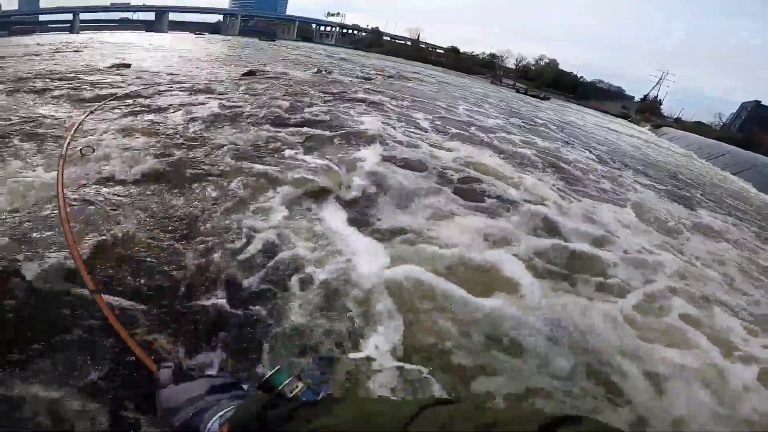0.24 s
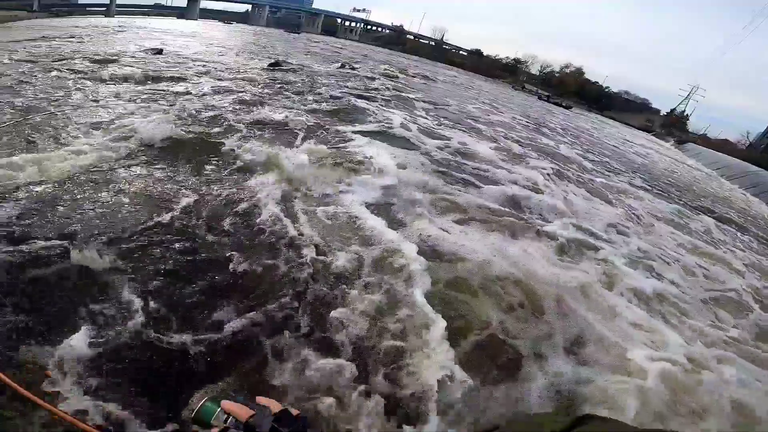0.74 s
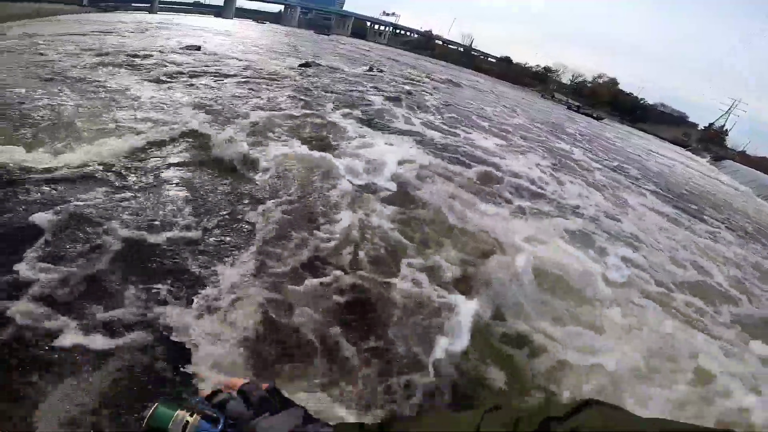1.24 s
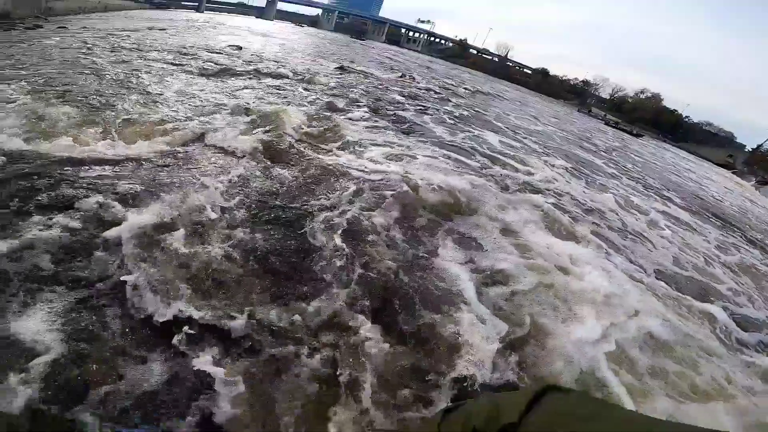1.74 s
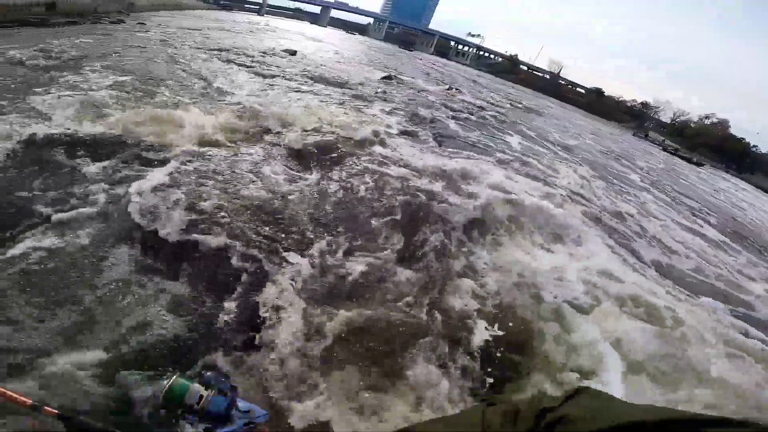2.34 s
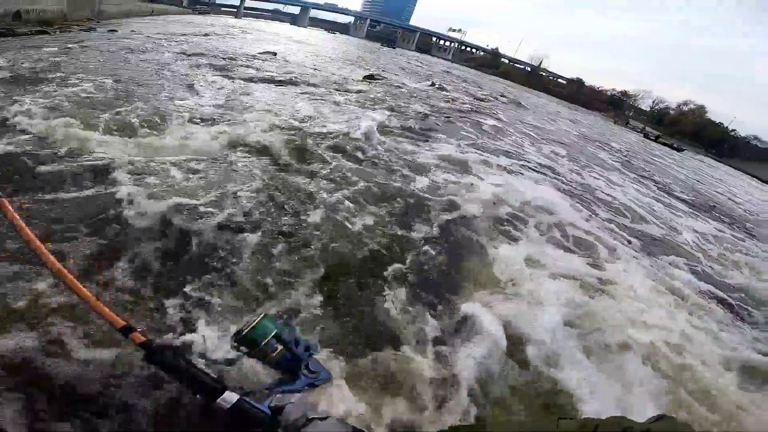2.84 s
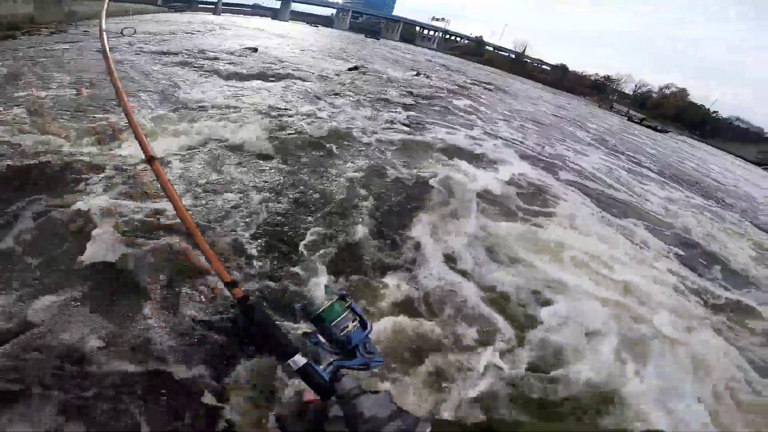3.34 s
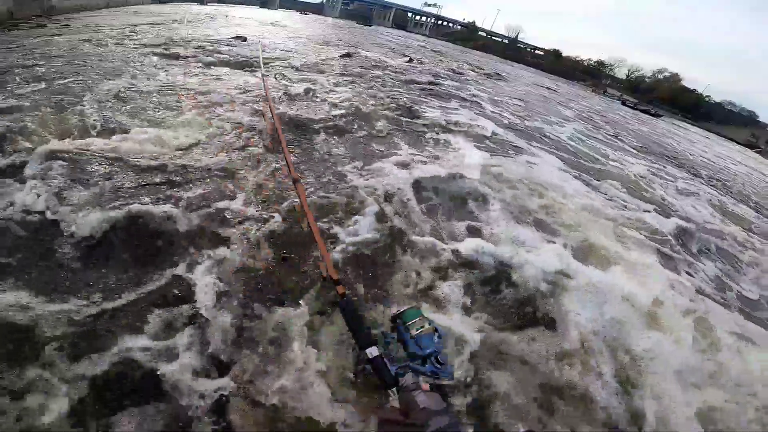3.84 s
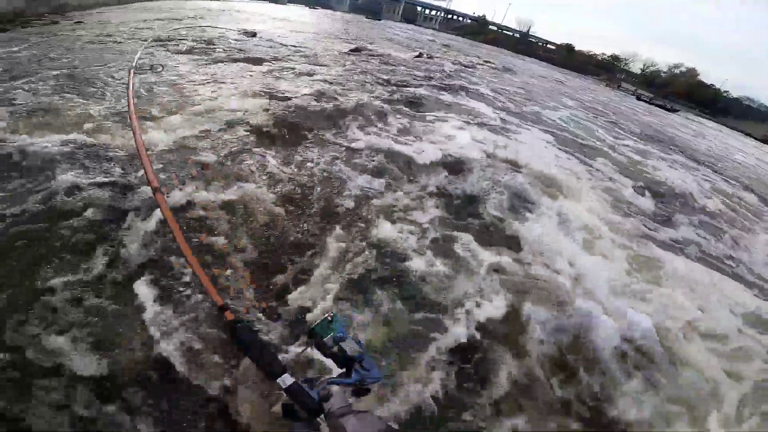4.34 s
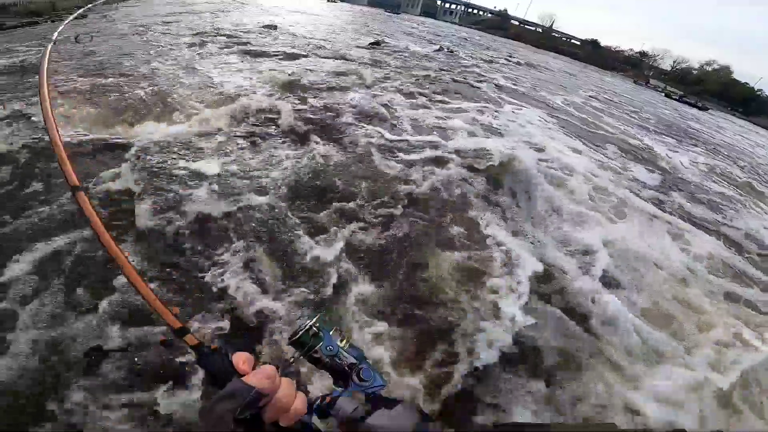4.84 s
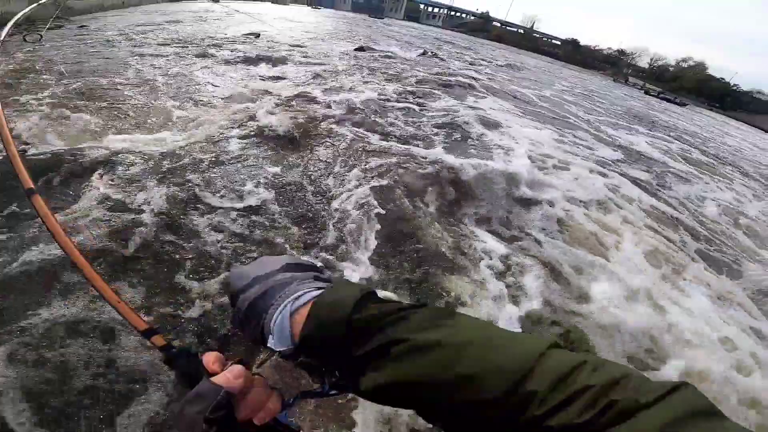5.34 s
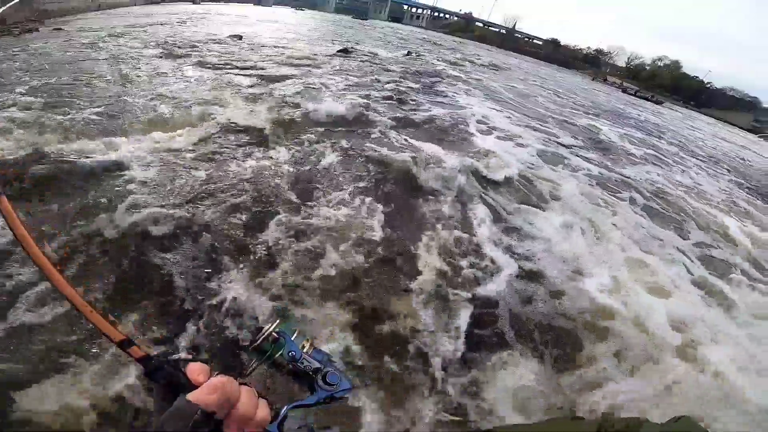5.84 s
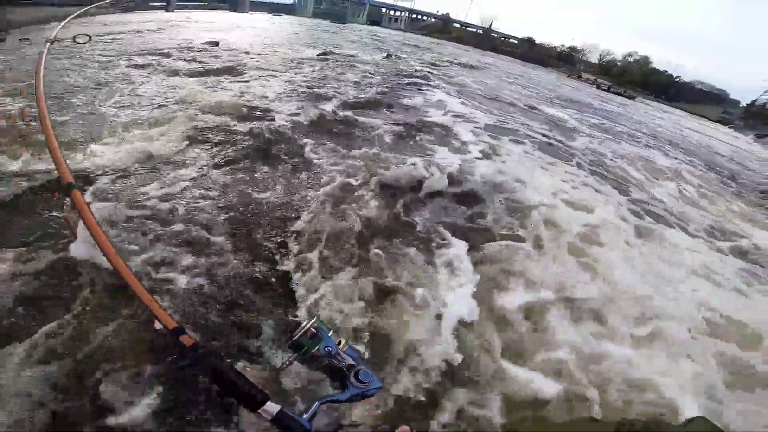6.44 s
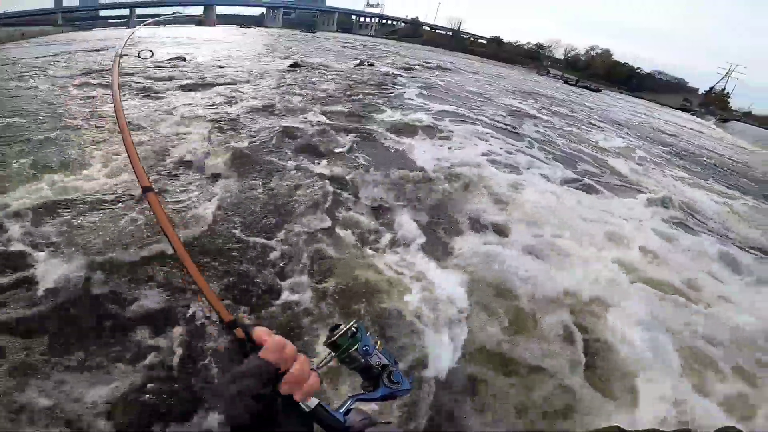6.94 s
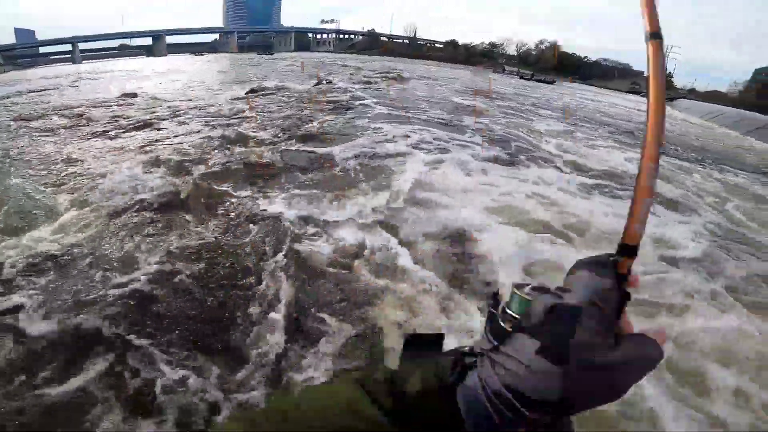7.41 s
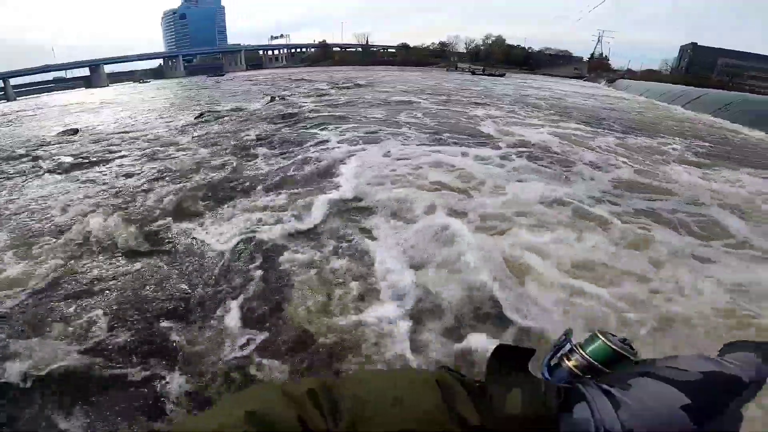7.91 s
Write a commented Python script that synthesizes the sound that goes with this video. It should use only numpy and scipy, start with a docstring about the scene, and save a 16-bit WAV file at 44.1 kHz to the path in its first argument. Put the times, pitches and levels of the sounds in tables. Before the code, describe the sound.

Whitewater below a low dam roars throughout, hollow and dull through a closed camera case at the water's edge. Nearby waves swell gently and a few drops slap and plink close in. Low wind buffets the microphone, strongest about halfway, where the river briefly dips in level and fishing gear knocks once. The wind then eases to a breeze, with a few more gusts and drops near the end.

```python
"""Whitewater below a low dam, from the two microphones of a cased camera on an angler at the water's edge.
Foam and bubbles roar throughout, hollow and dull through the closed case, and wind thumps on its wall.
Waves break nearby; from 1.2 s a few drops slap and plink close in. Around 4 s the strongest gusts make
the gain control duck the river, and the fishing gear knocks once. The wind falls to a breeze, and after
7 s the angler turns toward the dam, which changes the colour of the water."""
import sys
import numpy as np
from scipy import signal
from scipy.fft import rfft, irfft, next_fast_len
from scipy.io import wavfile
from scipy.ndimage import uniform_filter1d, minimum_filter1d, map_coordinates

SR = 44100
rng = np.random.default_rng(int(sys.argv[2]) if len(sys.argv) > 2 else 0)


def store_pcm(level_fs):
    """Save levels as 16-bit WAV."""
    pcm = np.round(np.clip(level_fs, -1, 1) * 32767).astype(np.int16)
    wavfile.write(sys.argv[1], SR, np.atleast_2d(pcm).T)


N = 360297

# rushing water as it reaches the microphones through the case wall: f/Hz, gain/dB
WATER_SPECTRUM = [(30, -18), (70, -1.5), (190, -0.5), (400, -6), (800, -13.5), (1600, -8), (2100, -19),
                  (4000, -21.5), (5100, -23), (6500, -30.5), (8600, -49.5), (12500, -50.5), (13700, -66)]
# peaks and notches of the case at each microphone: f/Hz, half width/Hz, left/dB, right/dB
CASE_RESONANCES = [(573, 200, 0, -2), (820, 89, -0.5, -4.5), (956, 175, 5, 1), (1212, 162, 6, -1),
                   (1320, 130, 2.4, 6.2), (2200, 98, 0.5, 2), (2528, 230, 7.5, 2), (2810, 100, 3, 0),
                   (3054, 158, 9, 6.5), (3360, 186, 8.5, 4), (3912, 325, 9.5, 6), (4540, 190, 2, 5.5),
                   (4890, 170, -2, 4), (5080, 130, 2.5, 2), (5350, 680, 3.5, 4), (5780, 1020, -6.5, 0.5),
                   (6380, 130, 2, -0.5), (7830, 810, 9, -4), (11700, 2000, 4, -8.5)]
# likeness of the water at the two microphones: f/Hz, coherence/0-1
MIC_COHERENCE = [(120, 0.97), (300, 0.98), (710, 0.94), (830, 0.68), (930, 0.82), (1290, 0.87),
                 (1420, 0.63), (1700, 0.97), (1950, 0.7), (2230, 0.9), (2620, 0.76), (2830, 0.7),
                 (3020, 0.65), (3400, 1), (3600, 0.5), (3880, 0.78), (4520, 0), (5080, 0.63), (5420, 0.3),
                 (5900, 0.6), (6170, 0.08), (6750, 0.5), (8000, 0.05)]
# how far the left microphone trails the right: f/Hz, phase/rad
MIC_LAG = [(100, 0), (600, 0.23), (1120, 0.03), (1600, 0.5), (1900, 1.05), (2220, 2.5), (2400, 2.05),
           (2730, 1.9), (2920, 1), (3150, 0.82), (3700, 1.85), (3920, 1.63), (4350, 2.5), (4750, 2.5),
           (5950, 4), (6400, 6), (7300, 5.2)]
# wind on the case, freshening and then dropping to a breeze: t/s, level/dB
WIND_LEVEL = [(0.0, -30), (1.6, -36.5), (2.3, -30), (2.7, -24.5), (3.7, -27.5), (4.2, -31.5), (6.0, -34),
              (7.0, -34), (8.15, -35)]
# gusts and lulls, over that wind: middle t/s, length/s, level/dB
WIND_GUSTS = [(0.155, 0.05, 4), (0.31, 0.17, -6.5), (0.55, 0.12, 6.5), (0.82, 0.12, 5.5),
              (1.16, 0.062, 7.5), (1.53, 0.14, -2), (1.83, 0.18, 4), (2.09, 0.2, 6.5), (2.31, 0.055, -2),
              (2.41, 0.07, 5), (2.65, 0.051, 5), (2.81, 0.044, -3), (2.9, 0.05, 4), (3.11, 0.04, 4),
              (3.56, 0.16, 7.5), (3.68, 0.046, -6), (3.8, 0.16, 10), (3.94, 0.037, -3), (4.04, 0.072, 14.5),
              (4.3, 0.12, -2.5), (4.5, 0.044, 7.5), (4.88, 0.1, -8), (5.05, 0.045, 4.5), (6.0, 0.055, -7),
              (6.11, 0.049, 5), (6.47, 0.08, 4), (6.73, 0.08, -8), (6.96, 0.045, 5), (7.19, 0.07, -4),
              (7.31, 0.041, 10), (7.54, 0.058, 8), (7.72, 0.14, 6.5), (7.94, 0.08, -4), (8.08, 0.07, 9)]
# buffeting right on the case: f/Hz, relative level/dB
BUFFET_SPECTRUM = [(4, -18), (12, -6.5), (26, -1.5), (40, -8.5), (55, -16), (80, -27), (140, -37.5),
                   (400, -98)]
# where the microphones point: t/s, heading/0-1 (0 the river, 1 the dam)
HEADING = [(0.0, 0.4), (0.45, 0), (7.15, 0.059), (7.6, 0.89), (8.15, 0.91)]
# change of colour when pointing at the dam: f/Hz, gain/dB
DAM_COLOUR = [(1700, 0), (2750, 1.5), (2950, -2), (3300, 0.5), (4300, -2.5), (5500, 0.5), (6900, -1.5),
              (8000, 0), (8500, 0)]
# extra lag of the left microphone when pointing at the dam: f/Hz, phase/rad
DAM_MIC_LAG = [(3600, 0), (4300, 0.67), (4900, -0.44), (5400, -1.6), (6200, -0.3)]
# single eddies hitting the case: t/s, peak level/dB (before each microphone's wind gain)
EDDY_HITS = [(0.163, -21.5), (1.405, -22.5), (2.42, -18), (4.063, -10.5), (6.497, -22), (7.065, -21.5)]
# waves breaking or slackening nearby: peak t/s, build/s, settle/s, spray level change/dB
WAVE_CRESTS = [(0.31, 0.08, 0.2, 2), (0.6, 0.089, 0.35, -0.5), (1.16, 0.07, 0.22, 2.3),
               (1.52, 0.16, 0.33, 2.6), (1.89, 0.03, 0.07, 1.2), (2.3, 0.025, 0.16, 1.5),
               (2.52, 0.065, 0.16, 1.2), (3.05, 0.18, 0.33, -1.4), (3.43, 0.02, 0.051, 1.4),
               (3.58, 0.041, 0.11, 1.8), (4.45, 0.31, 0.25, 0.3), (4.95, 0.17, 0.4, 0.5),
               (6.0, 0.42, 0.45, 1.3), (6.7, 0.1, 0.12, 1.7), (6.96, 0.048, 0.12, 1.1),
               (7.8, 0.15, 0.41, 1.4)]
# water folding over or easing close by: middle t/s, length/s, midrange level change/dB
WATER_FOLDS = [(0.45, 0.14, 3), (1.17, 0.2, 0.5), (1.4, 0.07, 2.3), (1.62, 0.15, 2.5), (1.83, 0.07, -2.5),
               (1.94, 0.068, 2.5), (2.37, 0.07, 1.5), (2.65, 0.18, 2.2), (3.26, 0.066, 1), (3.7, 0.11, 1.8),
               (4.42, 0.14, -1), (4.7, 0.15, -1.5), (4.97, 0.092, 1.8), (5.33, 0.094, 2.5),
               (6.04, 0.092, 2), (7.06, 0.063, 2.3), (7.55, 0.15, 0.8)]
# drops landing close in: t/s, relative level/dB, f/Hz, t60/s, slap over ring/dB
DROPS = [(1.207, -35, 4130, 0.014, 0), (1.232, -34, 5500, 0.016, 3), (1.351, -27, 3400, 0.008, 8),
         (1.42, -37, 3110, 0.016, 0), (1.462, -31, 3900, 0.016, 0), (1.524, -28, 6100, 0.02, -4),
         (1.547, -31, 5400, 0.012, 6), (1.569, -31, 3790, 0.018, 4), (1.583, -36, 3100, 0.016, 0),
         (1.884, -34, 4420, 0.018, 2), (2.288, -40, 3090, 0.027, 4), (2.318, -32, 6100, 0.015, 3),
         (2.537, -33, 5850, 0.016, 2), (5.367, -35, 3950, 0.015, 0), (5.449, -33, 3040, 0.018, -2),
         (6.329, -34, 3400, 0.021, 0), (6.424, -35.5, 4600, 0.018, 3), (6.9483, -31, 5500, 0.015, 1),
         (7.788, -38, 3750, 0.035, 2), (7.805, -32, 3620, 0.025, 1), (7.809, -27.5, 4200, 0.02, -1)]
SIDE = np.array([[1], [-1]])  # left and right microphone


def amp(db):
    """Decibels to gain."""
    return 10 ** (np.asarray(db) / 20)


def unit(x):
    """Scale so that the mean of the channels has rms 1."""
    return x / np.sqrt(np.mean(np.atleast_2d(x).mean(axis=0) ** 2) + 1e-20)


def along(points, hz):
    """Read rows of f/Hz, value on a log frequency axis."""
    freqs, values = np.transpose(points)
    return np.interp(np.log(hz + 1), np.log(freqs + 1), values)


def curve(rows):
    """Read rows of t/s, value at every sample."""
    times, values = np.transpose(rows)
    return np.interp(np.arange(N) / SR, times, values)


def swells(rows):
    """Smooth rises and falls from rows of t/s, length at half height/s, level/dB."""
    t = np.arange(N) / SR
    return sum(db * 2 ** -(2 * (t - s) / length) ** 2 for s, length, db in rows)


def wobble(rate):
    """A smooth random curve, rate knots a second."""
    knots = rng.standard_normal(int(N * rate / SR) + 4)
    return map_coordinates(knots, [np.arange(N) * rate / SR])


def filtered(x, response):
    """Filter x by a gain given as a function of f/Hz."""
    size = next_fast_len(N + SR // 2)
    return irfft(rfft(x, size) * response(np.fft.rfftfreq(size, 1 / SR)), size)[..., :N]


def foam(patchy_db):
    """Foam across the river: two noises whose strength drifts in patches of time and pitch."""
    spectra = signal.stft(rng.standard_normal((2, N)), nperseg=512)[2]
    patches = uniform_filter1d(rng.standard_normal(spectra.shape[1:]), size=7, axis=0)
    patches = uniform_filter1d(patches, size=14, axis=1)
    pair = signal.istft(spectra * amp(patchy_db * patches / patches.std()), nperseg=512)[1][:, :N]
    return pair / pair.std()


def bubbles(low_hz, high_hz, cycles, spread_db, rise, count, biggest_share=0.003):
    """Bubbles on all sides: each rings for some cycles and rises in pitch as it nears the surface."""
    when, pitch, size, bearing = rng.random((count, 4)).T[:, :, None]
    hz = low_hz * (high_hz / low_hz) ** pitch
    age = np.arange(SR // 100)
    turns = hz * age / SR
    life = turns / cycles
    envelope = (1 - np.exp(-2 * turns)) * amp(-60 * life)
    ring = np.sin(2 * np.pi * turns * (1 + rise * life / 2)) * envelope
    # many faint bubbles, few strong ones; high ones are brief but sharp
    ring = ring * hz * amp(-spread_db * np.log(np.maximum(1 - size, biggest_share)))
    at = ((when * N).astype(int) + age).ravel()
    panned = [ring * pan(2 * np.pi * bearing) for pan in (np.cos, np.sin)]
    pair = np.array([np.bincount(at, side.ravel(), N)[:N] for side in panned])
    return pair / pair.std()


def through_case(pair):
    """The closed case resonates: two unrelated sounds reach the microphones hollow and partly alike."""
    def blend(hz):
        angle = np.arccos(np.clip(along(MIC_COHERENCE, hz), 0, 1)) / 2
        return np.array([np.cos(angle), np.sin(angle)])

    def colour(hz):
        ring_db = sum(np.outer([left, right], np.exp(-((hz - centre) / width) ** 2))
                      for centre, width, left, right in CASE_RESONANCES)
        gain_db = along(WATER_SPECTRUM, hz) + ring_db + 1.27 * SIDE  # the left microphone is more open
        return amp(gain_db) * np.exp(-.5j * SIDE * along(MIC_LAG, hz))

    common, apart = filtered(pair, blend)
    return filtered(np.array([common + apart, common - apart]), colour)


def river(roar_db=-35.5, spray_db=-45.5, crossover_hz=1996, roar_follow=0.31, brightening=0.15):
    """From the bank: the wide roar of tumbling water and the more restless spray of the nearest waves."""
    def low_share(hz):
        return 1 / (1 + (hz / crossover_hz) ** 10)

    surge_db = breakers()
    churn_db = 0.54 * wobble(6.5)
    roar_gain = amp(roar_db + roar_follow * surge_db + churn_db)
    spray_gain = amp(spray_db + surge_db + churn_db + 0.28 * wobble(22))
    gurgle = bubbles(low_hz=507, high_hz=2334, cycles=18.3, spread_db=0.5, rise=0.094, count=8000)
    fizz = bubbles(low_hz=2050, high_hz=8700, cycles=18, spread_db=1.5, rise=0.13, count=7000)
    roar = through_case(foam(patchy_db=0.39) + amp(-15) * gurgle)
    roar = unit(filtered(roar, lambda hz: np.sqrt(low_share(hz))))
    spray = through_case(foam(patchy_db=0.86) + amp(-12) * fizz)
    spray = unit(filtered(spray, lambda hz: np.sqrt(1 - low_share(hz))))
    # a breaking crest throws more of the finest droplets, so louder spray is also brighter
    mist = filtered(spray, lambda hz: 1 - 1 / (1 + (hz / 4500) ** 8))
    spray = spray + mist * (amp(brightening * surge_db + 0.55 * wobble(8.2)) - 1)
    return roar_gain * churning(roar) + spray_gain * spray


def wind(evenness=0.85, deep_hz=50, flutter_growth=0.45, breeze_db=-30, puff_db=1.3, flutter_rel_db=-11):
    """Gusts push on the whole case, so both microphones get the same low buffeting, the left more."""
    buffet_db = curve(WIND_LEVEL) + swells(WIND_GUSTS) + puff_db * wobble(14)
    eddies = filtered(rng.standard_normal(N), lambda hz: amp(along(BUFFET_SPECTRUM, hz)))
    deep = filtered(eddies, lambda hz: 1 / (1 + (hz / deep_hz) ** 6))
    # even out the deep eddies so that their strength mostly follows the gust
    envelope = np.abs(signal.hilbert(deep, next_fast_len(N))[:N])
    power = np.abs(uniform_filter1d(envelope ** 2, size=SR // 18)) + 1e-20
    buffet = amp(buffet_db) * unit(deep / power ** (evenness / 2))
    # a stronger gust feeds the large, slow eddies more than the small ones
    flutter_db = breeze_db + flutter_rel_db + flutter_growth * (buffet_db - breeze_db)
    flutter = amp(flutter_db) * unit(eddies - deep)
    return (buffet + flutter + thumps()) * amp([[1.7], [-1.1]])


def facing_dam(pair):
    """Aimed damward, partly at first and almost fully at the end, the case colours the water anew."""
    def colour(hz):
        return amp(along(DAM_COLOUR, hz)) * np.exp(-.5j * SIDE * along(DAM_MIC_LAG, hz))

    return pair + curve(HEADING) * (filtered(pair, colour) - pair)


def thumps(width_s=0.0065):
    """A large eddy rolls past the microphones: it sucks at the case, then pushes, with no ring."""
    def push(u):
        return u * np.exp((1 - u ** 2) / 2)

    t = np.arange(N) / SR
    return sum(amp(db) * push((t - s) / width_s) for s, db in EDDY_HITS)


def breakers():
    """Crests near the bank build and mostly settle more slowly: level/dB over the steady spray."""
    t = np.arange(N) / SR
    return sum(db * 2 ** -((t - s) / np.where(t < s, build, settle)) ** 2
               for s, build, settle, db in WAVE_CRESTS)


def churning(roar, centre_hz=1330, width_hz=330, restless_db=0.35, calm_db=-0.55):
    """Water folds over close by and traps a cloud of air, briefly swelling the middle of the roar."""
    cloud = filtered(roar, lambda hz: np.exp(-((hz - centre_hz) / width_hz) ** 2))
    cloud_db = calm_db + swells(WATER_FOLDS) + restless_db * wobble(16)
    return roar + cloud * (amp(cloud_db) - 1)


def splashes(attack_s=0.00037, rise=0.077, boost_db=18.5):
    """Close in, a drop slaps the surface and traps a bubble that rings upward: a tick or a plink."""
    drops = np.zeros((2, N + SR))
    t = np.arange(SR // 20) / SR
    highpass = signal.butter(2, 3000, 'highpass', fs=SR, output='sos')
    for s, db, pitch_hz, t60, slap_db in DROPS:
        ring = np.sin(2 * np.pi * pitch_hz * t * (1 + rise * t / t60))
        slap = signal.sosfilt(highpass, rng.standard_normal(len(t))) * amp(slap_db)
        envelope = amp(db + boost_db - 60 * t / t60) * (1 - np.exp(-t / attack_s))
        drops[0, round(s * SR):][:len(t)] += envelope * (ring + slap)  # row 0 feeds both microphones
    return through_case(drops[:, :N])


def gain_control(x, threshold_db=-20.5, squeeze=0.54, attack_s=0.12, hold_s=0.15, release_db_per_s=9.5):
    """A strong gust makes the camera turn both microphones down; after a hold the river creeps back."""
    power = np.abs(uniform_filter1d(x.mean(axis=0) ** 2, size=SR // 14))
    level_db = 10 * np.log10(power + 1e-12)
    half_hold = int(hold_s * SR / 2) + 1
    under_db = np.minimum(threshold_db - level_db, 0)
    held_over_db = -minimum_filter1d(under_db, size=2 * half_hold + 1, origin=half_hold)
    recovery_db = release_db_per_s * np.arange(N) / SR
    cut_db = np.maximum.accumulate(squeeze * held_over_db + recovery_db) - recovery_db
    pole = np.exp(-1 / (attack_s * SR))
    return x * amp(-signal.lfilter([1 - pole], [1, -pole], cut_db))


def gear_knock(at_s=4.031, strike_db=-12, t60=0.063, soft_hz=4200):
    """The fishing gear bumps once near the microphones: a short, dull tap through the case."""
    t = np.arange(N) / SR - at_s
    tap = (t > 0) * amp(strike_db - 60 * np.abs(t) / t60) * rng.standard_normal((2, N))
    return through_case(filtered(tap, lambda hz: 1 / (1 + (hz / soft_hz) ** 4)))


def scene():
    """At the water's edge: river all around, drops and gear close in, wind right on the case."""
    return facing_dam(river() + splashes()) + gear_knock() + wind()


def record(dry, top_hz=13800):
    """The camera rides its gain and keeps nothing above its band limit."""
    return filtered(gain_control(dry), lambda hz: hz < top_hz)


dry = scene()
out = record(dry)
store_pcm(out)
```